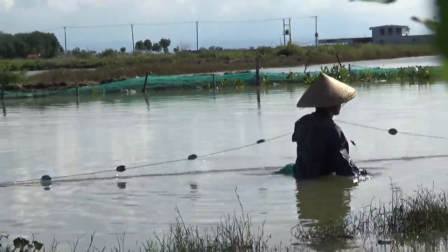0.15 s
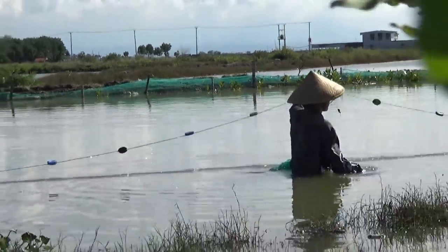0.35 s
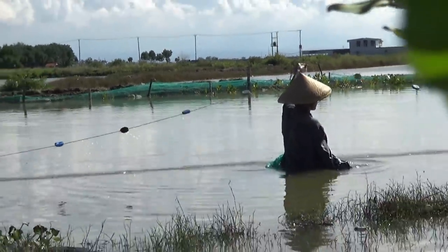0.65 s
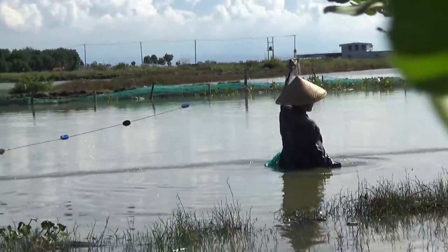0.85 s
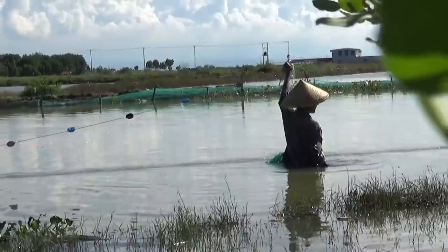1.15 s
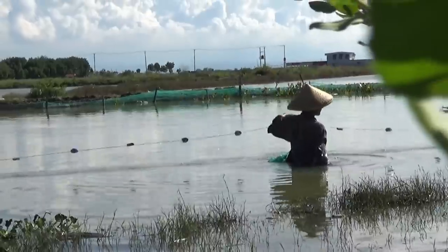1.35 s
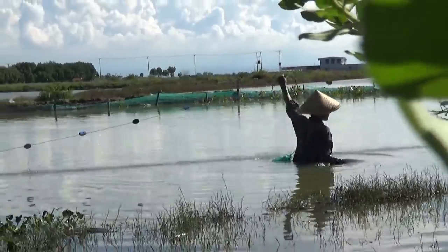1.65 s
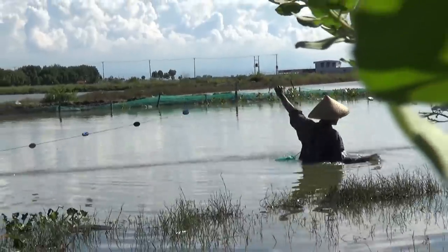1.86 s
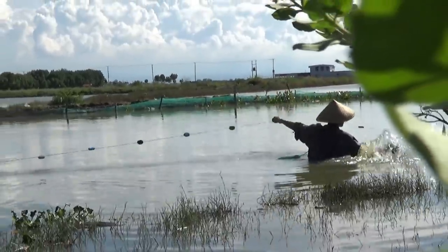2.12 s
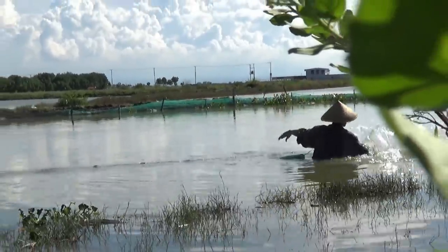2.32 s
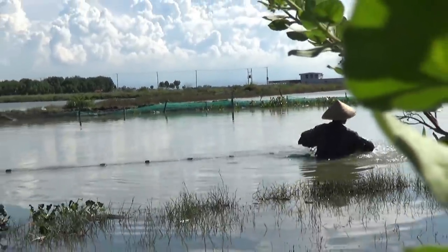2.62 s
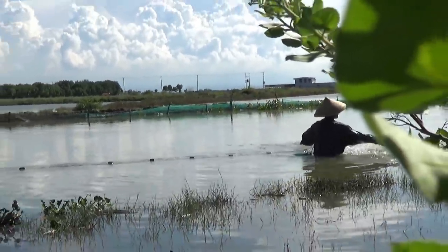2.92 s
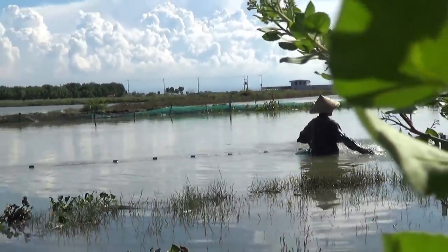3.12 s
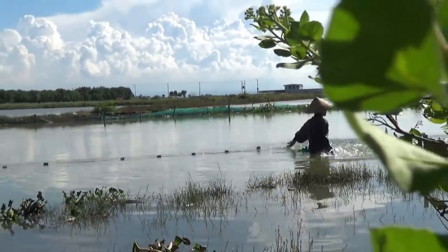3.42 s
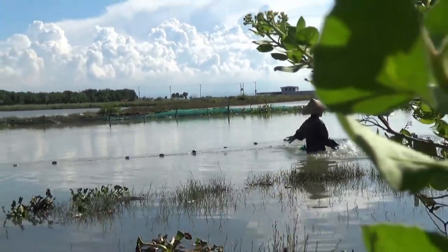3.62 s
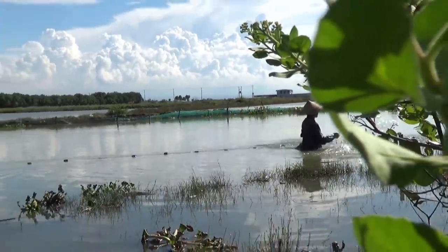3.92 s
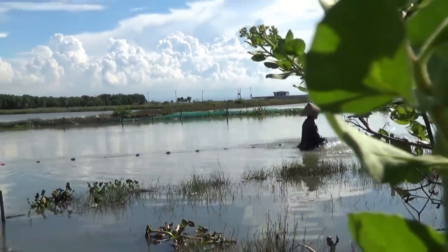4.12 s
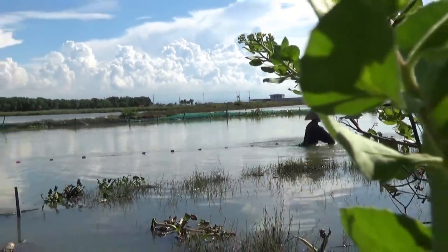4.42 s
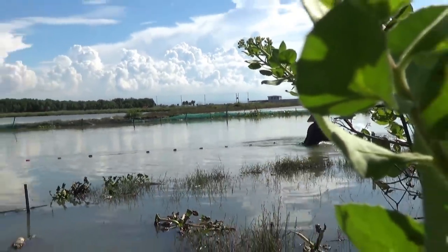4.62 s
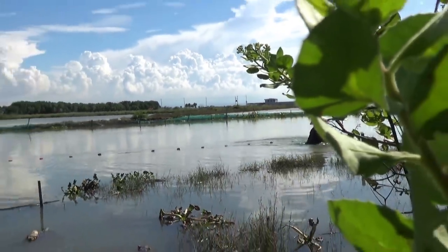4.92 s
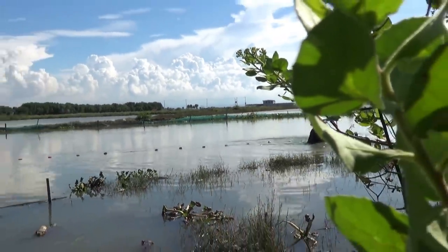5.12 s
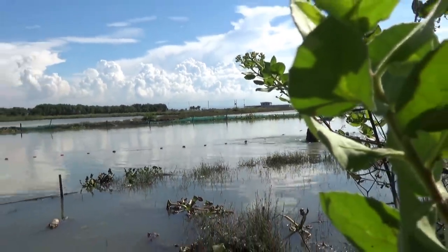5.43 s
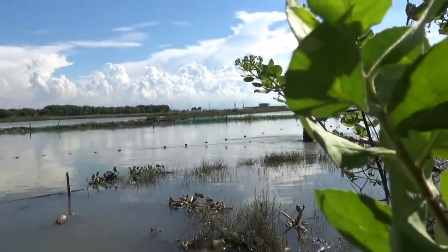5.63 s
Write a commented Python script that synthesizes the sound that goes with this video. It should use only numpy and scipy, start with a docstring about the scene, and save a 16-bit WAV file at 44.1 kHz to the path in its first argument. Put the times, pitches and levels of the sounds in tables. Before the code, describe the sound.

A soft wash of outdoor air lies over a flooded pond for the whole six seconds or so. Two small engines chug low and faint in the distance, one steady and the other slowly speeding up, while insects keep up a thin, high hiss. From about 0.2 seconds, scattered drops flicked off a net line hit the water with sharp, wet ticks, with small clusters near 1.1 and 1.6 seconds. At about 2 seconds the main sound begins: a wading person pushes arm, net and body through the pond. Stroke follows stroke, each with hissing spray, a gurgling slosh, plopping bubbles and more slapping drops. The splashing eases a little around 3.5 seconds, picks up again, and continues until about 5.3 seconds, then dies away in light drips. The water is heard in stereo, slightly to the left, with very little echo.

```python
"""Someone wades in a flooded pond, heard through two closely spaced microphone openings.
From the start, two small engines chug far away and insects hiss in the bushes over a soft wash of air.
Almost at once, drops flicked off a net line begin to slap the water. From about 2 seconds on, arm, net
and body push through the pond: each stroke throws up hissing spray and drags air under, where it
gurgles and rings as bubbles. The strokes die away just before the end."""
import sys
import numpy as np
from scipy import signal
from scipy.fft import rfft, irfft
from scipy.io import wavfile
from scipy.ndimage import uniform_filter1d

SR = 44100
rng = np.random.default_rng(int(sys.argv[2]) if len(sys.argv) > 2 else 0)


def dump_mix(stems):
    """Bounce the given channels to the path in sys.argv[1] as a 16-bit WAV at rate SR."""
    frames = np.atleast_2d(stems).T  # one column per channel
    limited = np.clip(frames, -1, 1)  # hard clip at full scale
    pcm = np.round(limited * 32767).astype(np.int16)
    wavfile.write(sys.argv[1], SR, pcm)


N = 254182


def amp(db):
    """Turns decibels into a number to multiply by."""
    return 10 ** (np.asarray(db) / 20)


def evened(x):
    """Scales a signal to an average power of 1."""
    return x / np.sqrt(np.mean(x ** 2) + 1e-20)


def value_at(points, hz):
    """Reads between the rows of a (pitch_hz, value) table."""
    pitches, values = np.transpose(points)
    return np.interp(np.log(hz + 1), np.log(pitches + 1), values)


def curves(rows):
    """Turns rows of (time_s, values...) into one curve for each value column."""
    times, *columns = np.transpose(rows)
    return [np.interp(np.arange(N) / SR, times, column) for column in columns]


def add(mix, start_s, sound):
    """Mixes a sound in at the given time."""
    part = mix[round(start_s * SR):][:len(sound)]
    part += sound[:len(part)]


def coloured(x, points):
    """Shapes the tone with a (pitch_hz, gain_db) table."""
    return irfft(rfft(x) * amp(value_at(points, np.fft.rfftfreq(N, 1 / SR))), N)


def resonate(x, hz, width_hz):
    """Lets through a band around one pitch."""
    decay = np.exp(-np.pi * width_hz / SR)
    return 2 * signal.lfilter([1 - decay], [1, -decay * np.exp(2j * np.pi * hz / SR)], x).real


def air():
    """A soft, distant wash of noise from all around, partly alike on the left and right."""
    # Tone of the wash: pitch_hz, gain_db
    tone = [(20, -36), (35, -61), (60, -18), (130, -7), (210, -14), (400, -18.5), (800, -21), (1500, -25.5),
            (3000, -29.5), (6500, -35.5), (10000, -33.5), (13000, -30), (16000, -31)]
    # How alike the two sides are: pitch_hz, likeness (1 = the same)
    likeness = [(20, 1), (130, .96), (290, .45), (640, .08), (1410, -.15), (3100, .33), (6820, .75),
                (15000, 1)]
    # Dimming of the highest treble: time_s, gain_db
    treble = [(0, -6), (1, -7), (1.3, -10), (5.76, -8)]
    frames, hz = N // 256 + 5, np.fft.rfftfreq(1024, 1 / SR)
    a, b, c, d, patches = rng.standard_normal((frames, 513, 5)).T
    left, unrelated = a + 1j * b, c + 1j * d
    same = value_at(likeness, hz)[:, None]
    right = same * left + np.sqrt(1 - same ** 2) * unrelated
    flicker_db = 1.65 * evened(uniform_filter1d(uniform_filter1d(patches, 10, 0), 10, 1))
    treble_db = np.interp(np.arange(frames) * 256 / SR, *np.transpose(treble))
    treble_share = np.clip((hz[:, None] - 9500) / 2500, 0, 1)
    gain = amp(value_at(tone, hz)[:, None] + flicker_db + treble_db * treble_share)
    wash = signal.istft(np.array([left, right]) * gain, nperseg=1024, noverlap=768)[1]
    return amp(-45.5) * evened(wash[:, :N])


def engine(firing_hz, level_db, pipe, start_cycle):
    """Regular firings make overtones, shaped by the exhaust pipe and wavering a little in the air."""
    cycles = start_cycle + np.cumsum(firing_hz) / SR
    out = np.zeros(N)
    for harmonic in range(2, 15):
        waver = evened(uniform_filter1d(rng.standard_normal(N), 9000, mode="wrap"))
        strength = amp(value_at(pipe, harmonic * firing_hz) + 1.5 * waver)
        out -= strength * np.cos(2 * np.pi * harmonic * cycles + .2 * waver)
    return np.sqrt(2) * amp(level_db) * out


def far_engines():
    """Two engines chug: one holds a nearly steady speed, the other slowly speeds up."""
    # Firings each second: time_s, steady_hz, rising_hz
    speeds = [(0, 18.6, 14.5), (.4, 18.65, 14.67), (.9, 18.73, 14.93), (1.4, 19.03, 15.22),
              (1.9, 19.3, 15.38), (2.4, 19.4, 15.88), (2.9, 19.44, 16.2), (3.4, 19.57, 16.5),
              (3.9, 19.53, 17.03), (4.4, 19.15, 17.52), (4.9, 19.05, 17.78), (5.76, 19.2, 18.35)]
    # Loudness as the air carries it: time_s, steady_db, rising_db
    loudness = [(0, -50.5, -53.5), (2, -52.5, -51.5), (3, -51.5, -50.5), (4, -51.5, -52),
                (4.6, -57.5, -50.5), (5.2, -61, -50.5), (5.76, -49, -53.5)]
    # Tone of each exhaust pipe: pitch_hz, gain_db
    steady_pipe = [(36, -24), (58, -16), (76, -10), (96, -6), (115, 0), (135, -4), (155, -12), (180, -19),
                   (260, -26)]
    rising_pipe = [(30, -26), (46, -12), (75, -12), (90, -11), (105, -7), (125, -3), (150, 1), (165, -5),
                   (185, -15), (260, -24)]
    steady_hz, rising_hz = curves(speeds)
    steady_db, rising_db = curves(loudness)
    steady = engine(steady_hz, steady_db, steady_pipe, start_cycle=.18)
    return steady + engine(rising_hz, rising_db, rising_pipe, start_cycle=.35)


def insects():
    """Many wings make a high hiss: a few narrow bands of noise, fluttering quickly."""
    # Bands of the hiss: pitch_hz, width_hz, relative_db
    bands = [(8660, 130, 11.5), (9020, 20, 1), (8900, 32, 11), (9650, 890, 4)]
    # Loudness of the whole chorus: time_s, level_db
    chorus = [(0, -54.5), (.9, -56), (1.5, -55.5), (1.75, -55), (3.7, -54.5), (5.4, -55), (5.76, -54)]
    flutter_db = 1.5 * evened(resonate(rng.standard_normal(N), 180, 200))
    hiss = sum(amp(db) * evened(resonate(rng.standard_normal(N), hz, width)) for hz, width, db in bands)
    return amp(curves(chorus)[0]) * evened(hiss * amp(flutter_db))


def drop_slaps():
    """Drops hit the water: a sharp tick and a short wet tail, each a bright crack with a lower thud."""
    # One row for each drop: start_s, level_db (before distance), pitch_hz, thud_relative_db
    drops = [(0.2003, -20.5, 9300, -23), (0.215, -19, 9500, -25), (0.581, -24.5, 8820, -2.5),
             (0.6285, -21, 8790, -18), (1.063, -28, 4500, -27), (1.0982, -14, 2850, -7),
             (1.1417, -18, 3320, -20), (1.16, -27, 2060, -11), (1.241, -35, 10800, -30),
             (1.6, -19.5, 3930, -2), (1.6082, -13, 3880, 0.5), (1.6136, -11, 10100, -20),
             (1.621, -16, 9600, -26), (1.7822, -26, 1500, -10), (1.945, -24, 8900, -5),
             (1.9913, -24.5, 3670, -22), (2.074, -18, 2210, -18), (2.212, -20, 4100, -23),
             (2.389, -15.5, 11000, -25), (2.4575, -5.5, 11400, -15), (2.4642, -2.5, 10700, -6.5),
             (2.4686, -13, 3160, -10), (2.714, -8.5, 4050, -7), (2.793, -15, 4470, -27),
             (2.901, -19, 11000, -30), (2.952, -17, 5700, -19), (3.032, -13, 4240, -14),
             (3.043, -11, 4300, -16), (3.215, -9.5, 3320, -21), (3.2414, -8, 3660, -2),
             (3.3419, -3.5, 3420, -14), (3.423, -8, 3140, -30), (3.465, -14.5, 1860, 1.5),
             (3.481, -13, 5500, -20), (3.5218, -12.5, 4740, -15), (3.535, -14.5, 4600, -20),
             (3.6943, -14.5, 4200, -5.5), (3.7426, -10, 3030, -3), (4.254, -8, 2880, -23),
             (4.3871, -5.5, 5500, -7), (4.5503, -10, 3150, -31), (4.6936, -10.5, 3500, -30),
             (4.8764, -7, 3870, -29), (4.89, -11, 4700, -20), (4.9002, -11, 4080, -7),
             (4.969, -8.5, 4030, -7), (5.0088, -8, 3700, -31), (5.114, -11, 2200, -5),
             (5.147, -11, 4500, -24), (5.168, -6.5, 3520, -21), (5.2644, -10, 4300, -4),
             (5.277, -9.5, 3100, -37)]
    # Distance softens everything, the very top most: pitch_hz, gain_db
    distance = [(11500, -9.0), (13500, -18), (16000, -22)]
    t = np.arange(1500) / SR
    tick, tail = amp(9.5 - 60 * t / 0.0033), amp(-60 * t / 0.034)
    shape = (tick + tail) * (1 - np.exp(-t / 0.00042))
    wide_band = signal.butter(2, [1500, 11000], "band", fs=SR, output="sos")
    out = np.zeros(N)
    for start_s, level_db, hz, thud_db in drops:
        noise = rng.standard_normal(len(t))
        pitched = evened(resonate(resonate(noise, hz, .5 * hz), hz, hz))
        crack = shape * (pitched + 0.35 * signal.sosfilt(wide_band, noise))
        thud = shape * evened(resonate(resonate(noise, 1120, 1100), 1500, 1900))
        slap = crack / abs(crack).max() + amp(thud_db) * thud / abs(thud).max()
        add(out, start_s, amp(level_db) * slap)
    return coloured(out, distance)


def surge(start_s, rise_s, hold_s, fall_db_per_s):
    """The power of one stroke, every 32 samples: it rises, holds, then falls."""
    age = np.arange(0, N + 32, 32) / SR - start_s
    fall_db = fall_db_per_s * np.maximum(age - rise_s - hold_s, 0)
    return np.clip(age / rise_s, 0, 1) ** 2.08 * amp(-fall_db) ** 2


def bubble(hz, ring_s, glide, rise_s):
    """A pocket of air rings and fades by 60 dB, its pitch climbing as it nears the surface."""
    t = np.arange(int(ring_s * SR) + 8) / SR
    tone = np.sin(2 * np.pi * hz * t * (1 + glide * t / ring_s))
    fade = amp(-60 * (t / ring_s) ** 1.18)
    return tone * (1 - np.exp(-t / rise_s)) * fade


def swarm(low_hz, high_hz, cycles, per_s, spread_db, clump_db, sizes):
    """Bubbles of many sizes ring at random moments, swelling together in clumps."""
    out = np.zeros(N)
    for hz in np.geomspace(low_hz, high_hz, sizes):
        chance = rng.random(N) * SR * sizes / per_s  # under 1 starts a bubble; loud ones are rare
        strength = np.maximum(chance, 1e-9) ** (-spread_db * np.log(10) / 20)
        starts = np.minimum(strength, amp(4 * spread_db)) * (chance < 1)
        ring = bubble(hz, cycles / hz, glide=0.23, rise_s=1 / hz)
        out += signal.oaconvolve(starts, ring / np.linalg.norm(ring) * np.sqrt(hz))[:N]
    clumps = evened(uniform_filter1d(uniform_filter1d(rng.standard_normal(N), 500), 300))
    return evened(out * amp(clump_db * clumps))


def wading():
    """Each push through the water makes spray, finer mist, falling drips and a deep, bubbly slosh."""
    # Pushes of arm, net and body: start_s, rise_s, hold_s, spray_db, slosh_db, mist_relative_db
    strokes = [(1.627, 0.046, 0.58, -55, -58, 1.5), (2.067, 0.021, 0.0082, -32.5, -45, -30),
               (2.069, 0.036, 0.14, -35.5, -34, -6), (2.202, .1, 0.19, -34.5, -34, -0.5),
               (2.461, 0.12, 0.09, -32, -35.5, -0.5), (2.651, 0.058, 0.028, -30, -42, -3),
               (2.844, 0.048, 0.046, -44.5, -36.5, 2), (2.965, 0.028, 0.15, -38, -43, 5.5),
               (3.148, 0.043, 0.2, -34, -41, 1), (3.47, 0.076, 0.28, -43.5, -47.5, 1.3),
               (3.774, 0.14, 0.071, -37.5, -40, -0.8), (4.004, 0.058, 0.13, -36.5, -45.5, -1),
               (4.186, .07, 0.18, -32, -42, 0.5), (4.445, .04, 0.043, -42, -42.5, -.6),
               (4.622, 0.052, 0.016, -39, -37.5, 0.8), (4.755, 0.1, 0.12, -36.5, -43, 0.5),
               (4.93, 0.042, 0.086, -32, -39.5, -1.2), (5.064, 0.066, 0.08, -31.5, -44, -1),
               (5.293, 0.046, .1, -55, -48, -12)]
    # Tone of the spray and of the slosh: pitch_hz, gain_db
    spray_tone = [(760, -15), (1300, 6.5), (1490, 5.5), (1670, 5), (2420, 1.5), (3240, 6), (3880, 6.5),
                  (4930, 3.5), (6020, -2), (7050, 0), (8700, -3), (10800, 0.5), (13700, -15.5),
                  (16000, -23)]
    slosh_tone = [(120, -58), (220, -13), (330, -11), (500, -10.5), (700, -5), (950, -3), (1200, -1.5),
                  (1500, -24.5), (2000, -12.5), (2800, -24)]
    power = 0
    for start, rise, hold, spray_db, slosh_db, mist_db in strokes:
        spray = surge(start, rise, hold, fall_db_per_s=69.5)
        mist = spray * surge(start, 0.087, N / SR, fall_db_per_s=0)  # builds up more slowly
        drips = surge(start, rise, hold, fall_db_per_s=25)  # keep falling after the stroke
        slosh = surge(start + 0.0079, rise, hold, fall_db_per_s=71)  # air is dragged under a bit later
        levels = amp([spray_db, spray_db + mist_db, spray_db - 15, slosh_db])
        power = power + levels[:, None] ** 2 * [spray, mist, drips, slosh]
    spray, mist, drips, slosh = (np.interp(np.arange(N) / 32, np.arange(len(p)), p ** .5) for p in power)
    fizz = swarm(1300, 15500, cycles=8, per_s=7000, spread_db=3.6, clump_db=1.4, sizes=36)
    fizz = evened(coloured(fizz + .8 * rng.standard_normal(N), spray_tone))
    fine_fizz = signal.sosfiltfilt(signal.butter(2, 4800, "high", fs=SR, output="sos"), fizz)
    patter = swarm(1500, 12000, cycles=6, per_s=350, spread_db=3.6, clump_db=2.1, sizes=14)
    patter = evened(coloured(patter, spray_tone))
    gurgle = swarm(200, 2400, cycles=13, per_s=2200, spread_db=3.3, clump_db=1.8, sizes=32)
    gurgle += .25 * coloured(rng.standard_normal(N), [(2200, 10), (3200, -40)])
    gurgle = evened(coloured(gurgle, slosh_tone))
    return spray * (fizz - fine_fizz) + mist * fine_fizz + drips * patter + slosh * gurgle


def big_bubbles():
    """Single large air pockets ring out, each wobbling in loudness."""
    # One row for each bubble: start_s, level_db (before the wobble), pitch_hz, ring_s
    pockets = [(1.977, -28, 316, 0.027), (2.111, -22, 1027, 0.043), (2.134, -28, 608, 0.065),
               (2.152, -18.5, 883, 0.051), (2.164, -21, 347, 0.029), (2.179, -18, 292, 0.035),
               (2.209, -37, 268, 0.073), (2.441, -21, 1050, 0.04), (2.165, -23, 554, 0.04),
               (2.474, -31, 313, 0.082), (2.619, -24, 1710, 0.032), (2.946, -25, 975, 0.058),
               (2.964, -28, 826, 0.045), (3.345, -17, 1005, 0.025), (3.561, -25.5, 1034, 0.033),
               (3.8, -35, 590, 0.047), (3.858, -30.5, 714, 0.11), (3.858, -21.5, 390, 0.026),
               (3.907, -27, 510, 0.078), (3.951, -25.5, 1012, 0.044), (3.968, -17, 886, 0.064),
               (4.1, -26, 1103, 0.074), (4.119, -31.5, 883, 0.15), (4.258, -27, 1740, 0.035),
               (4.325, -24, 1140, 0.028), (4.413, -20, 1230, 0.036), (4.436, -22, 1550, 0.035),
               (4.461, -23.5, 1720, 0.04), (4.485, -24, 1910, .04), (4.542, -16.5, 1216, 0.023),
               (4.896, -24, 541, 0.028), (4.898, -35, 380, 0.026), (4.685, -25.5, 555, 0.028),
               (5.26, -30, 1660, 0.031), (5.548, -28, 318, 0.033)]
    wobbles_db = 4.4 * evened(uniform_filter1d(rng.standard_normal((len(pockets), 8000)), 120, axis=1))
    out = np.zeros(N)
    for (start_s, level_db, hz, ring_s), wobble_db in zip(pockets, wobbles_db):
        ring = bubble(hz, ring_s, glide=.1, rise_s=.004)
        add(out, start_s, amp(level_db + wobble_db[:len(ring)]) * ring)
    return out


def from_the_left(x, left_db):
    """Sound from one side reaches the left opening first; left_db tips the balance to the left."""
    # How far ahead the wave is on the left: pitch_hz, lead_radians
    lead = [(170, .4), (340, .7), (600, 1.25), (1200, 1.38), (2300, .95), (4500, .72), (8600, .32),
            (11000, .14), (13000, 0)]
    half_lead = .5 * value_at(lead, np.fft.rfftfreq(N, 1 / SR))
    left = amp(left_db) * np.exp(1j * half_lead)
    return irfft(rfft(x) * np.array([left, 1 / left]), N)


def pond_echoes(x):
    """Faint, short echoes scatter off water, reeds and banks, differently for each side."""
    t = np.arange(4000) / SR
    band = signal.butter(1, [900, 8000], "band", fs=SR)
    tail = signal.lfilter(*band, rng.standard_normal((2, len(t)))) * amp(-60 * t / .08)
    return amp(-15) * signal.fftconvolve(x[None], tail / np.linalg.norm(tail[0]), axes=1)[:, :N]


def scene():
    """Mixes the water and its echoes with the insects, engines and air, in stereo."""
    water = wading() + drop_slaps() + big_bubbles()
    engines = from_the_left(far_engines(), left_db=.01)
    return from_the_left(water + insects(), left_db=-.3) + pond_echoes(water) + engines + air()


def record(dry):
    """Cuts away the very highest treble."""
    cutoff_hz = 15760
    low_pass = signal.firwin(511, cutoff_hz, window=("kaiser", 9), fs=SR)
    return signal.oaconvolve(dry, low_pass[None], "same")


dry = scene()
out = record(dry)
dump_mix(out)
```